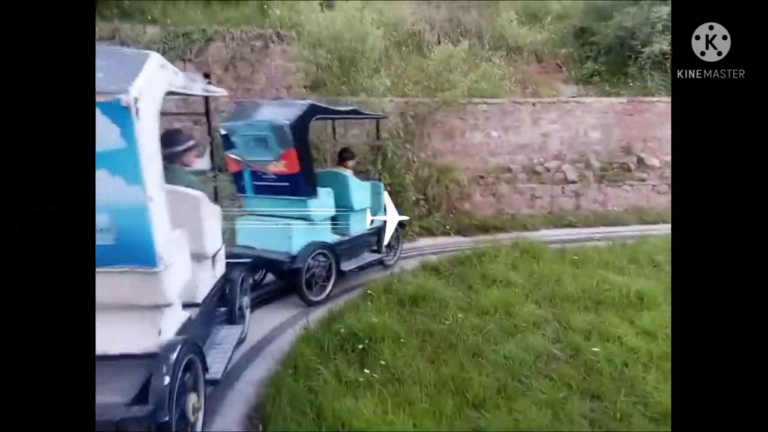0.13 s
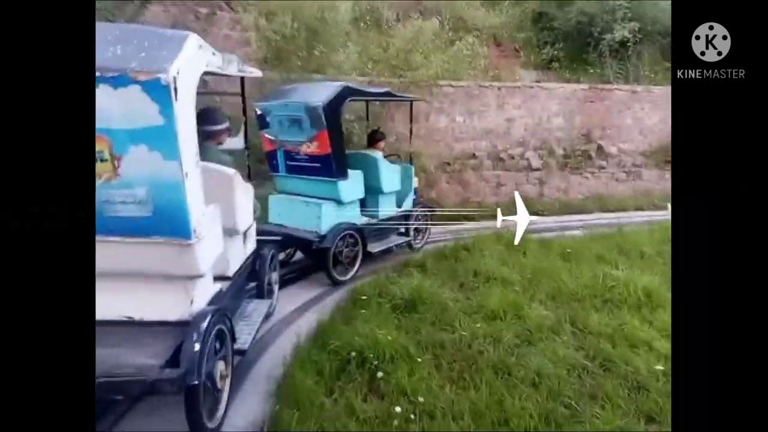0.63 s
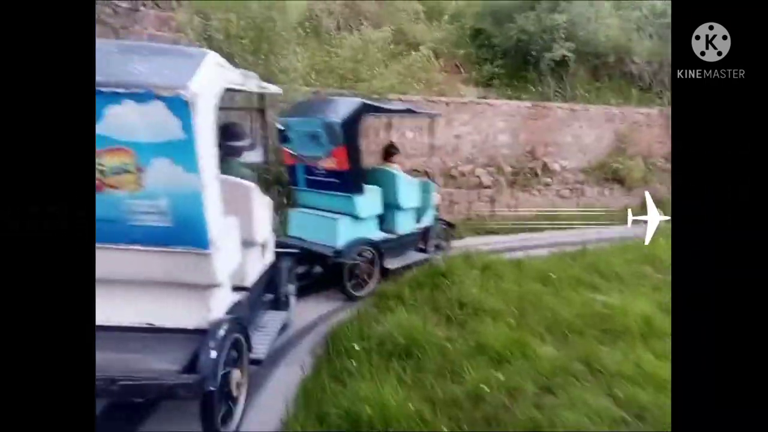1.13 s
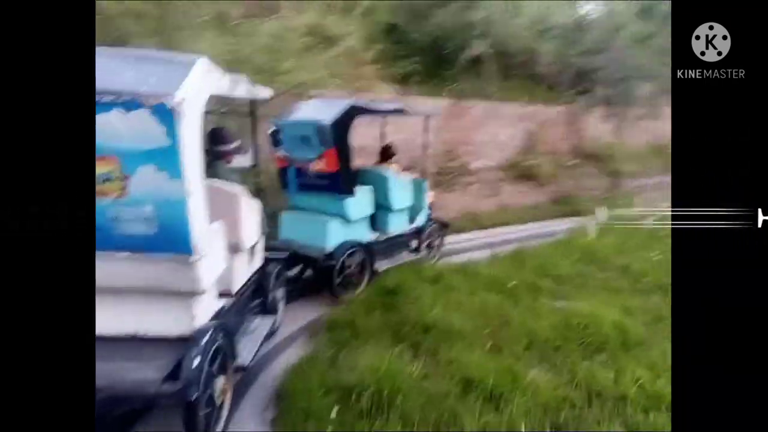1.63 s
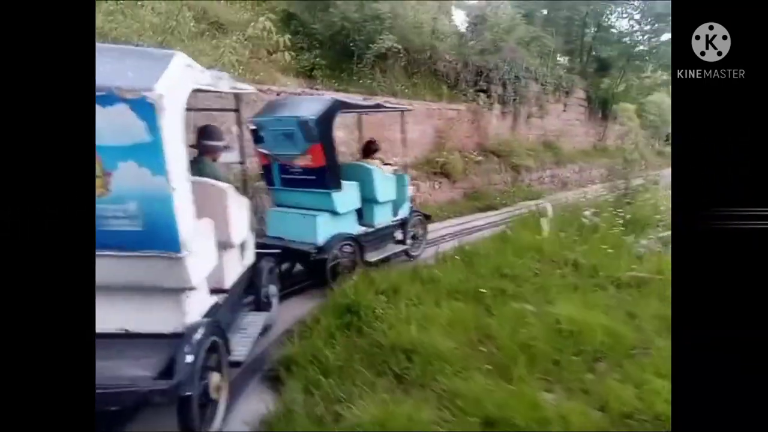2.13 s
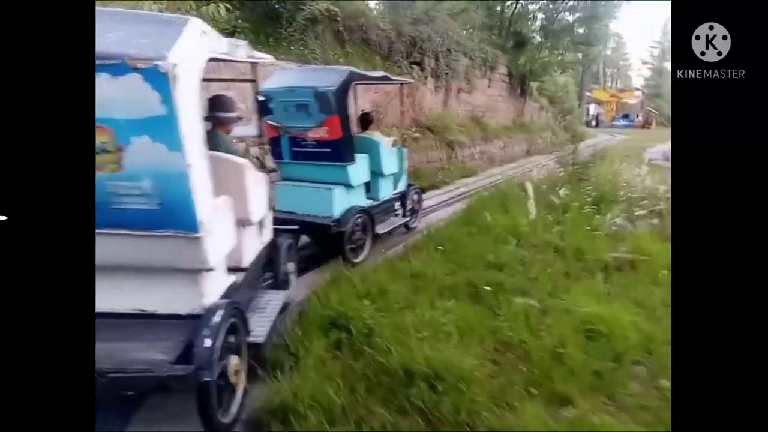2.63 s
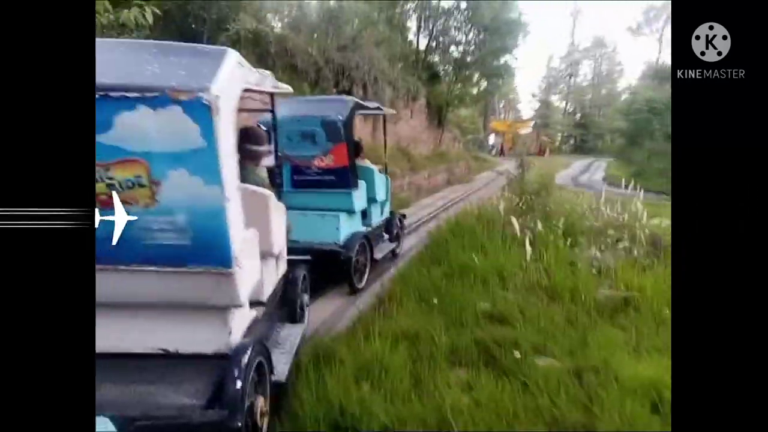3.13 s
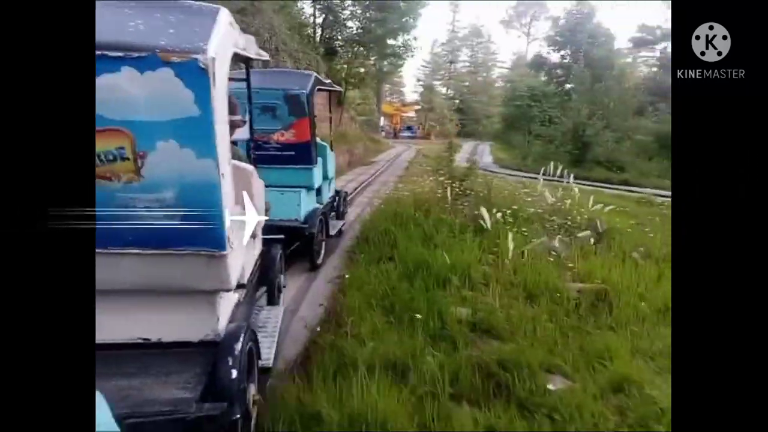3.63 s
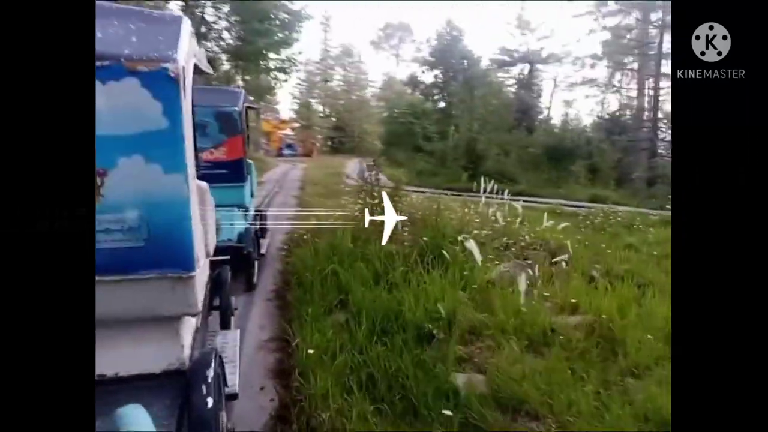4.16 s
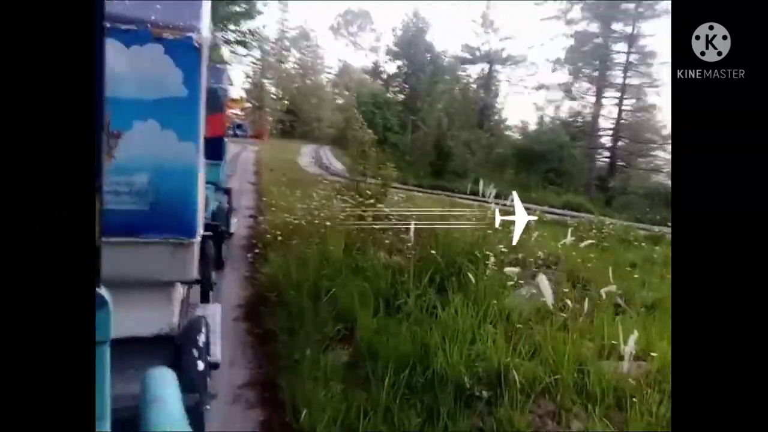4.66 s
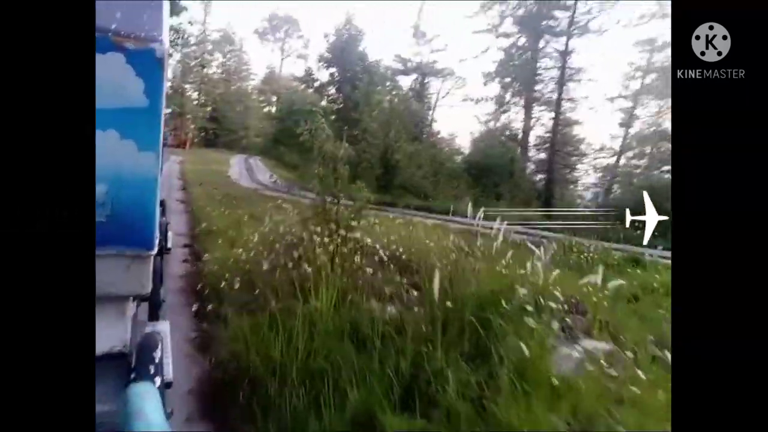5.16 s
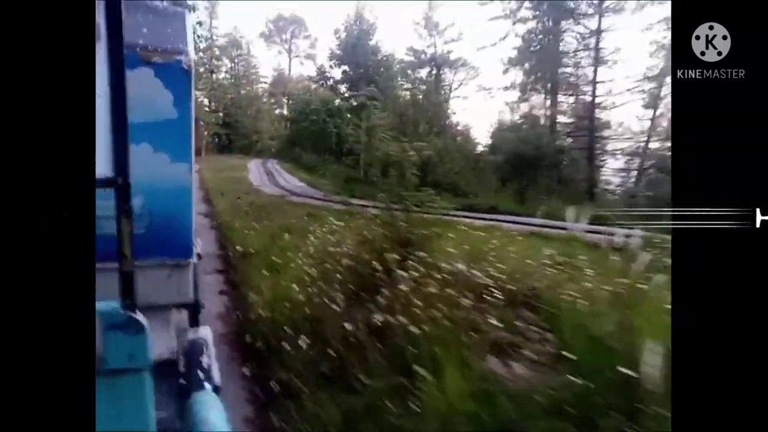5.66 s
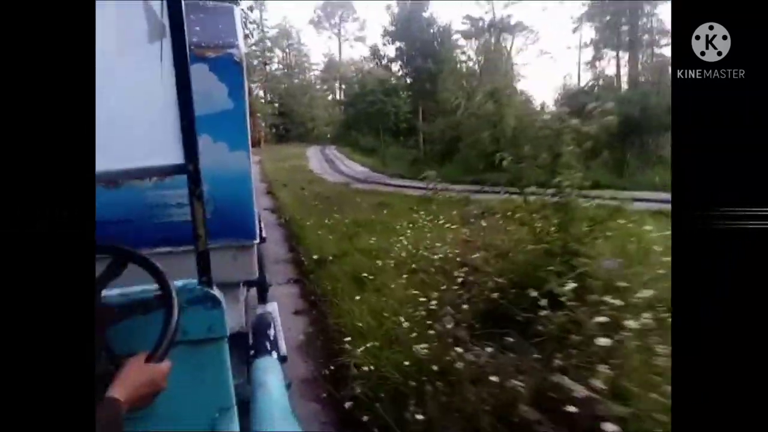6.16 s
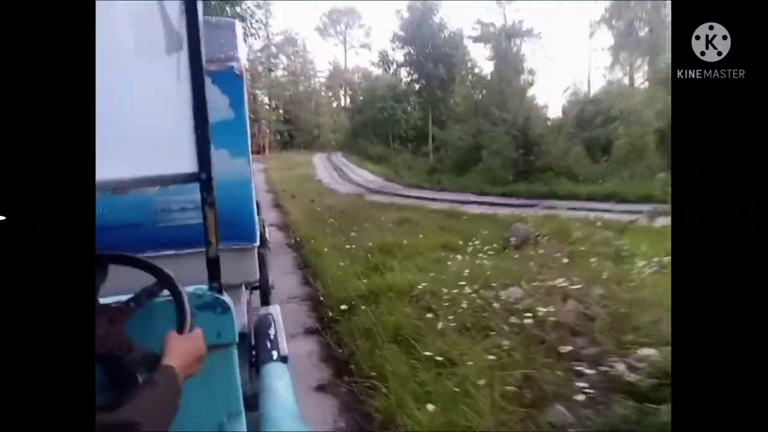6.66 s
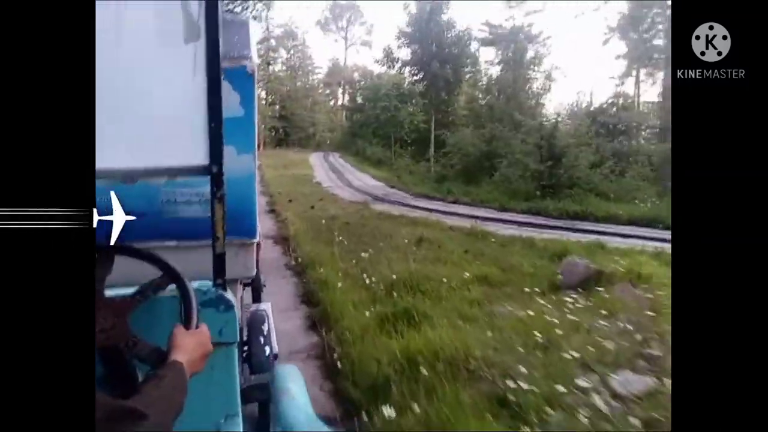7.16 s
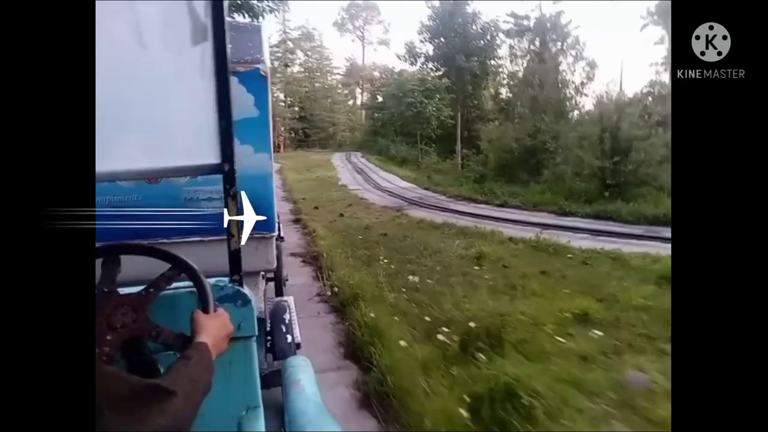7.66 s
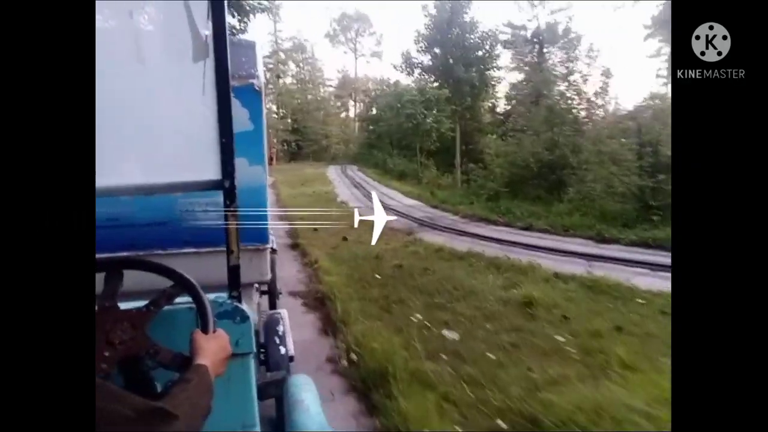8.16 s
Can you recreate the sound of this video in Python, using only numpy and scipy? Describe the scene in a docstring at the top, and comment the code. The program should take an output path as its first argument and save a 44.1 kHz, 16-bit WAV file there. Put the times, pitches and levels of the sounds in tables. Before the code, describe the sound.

An open-air microphone in a wood catches eight ticking chips, then a loud shimmering trill of rising and falling whistles. Farther birds answer, some raspy. From the middle on, a second singer throws out quick liquid whistles, runs and buzzes, then stops. Thin calls drift over open ground at the end, with smeared echoes and a low, steady wind rush.

```python
"""A finch chips, then trills, in a wood; a warbler sings a long string of whistles, sweeps and buzzes.
Farther birds call behind them, some hoarse, some across open ground. Voices are near-sine whistles
gliding through three pitches. Leaves smear the notes and noise echoes from the trees give them a tail,
over a soft rush of far wind made of shaped noise."""
import sys
import numpy as np
from scipy import signal
from scipy.fft import rfft, irfft, next_fast_len
from scipy.io import wavfile
from scipy.ndimage import uniform_filter1d

SR = 44100
rng = np.random.default_rng(int(sys.argv[2]) if len(sys.argv) > 2 else 0)


def boost_factor(decibels):
    """Convert a level in decibels to a linear amplitude factor."""
    exponent = np.asarray(decibels, float) / 20
    return 10 ** exponent


def put_to_file(sound):
    """Save the sound as 16-bit audio at rate SR, in the file named by the first command-line argument."""
    columns = np.atleast_2d(sound).T  # one column per channel
    safe = np.clip(columns, -1, 1)
    whole_steps = np.round(safe * 32767)
    wavfile.write(sys.argv[1], SR, whole_steps.astype(np.int16))


N = 365588

# Finch chip stroke: (time after chip [s], length [s], first [Hz], middle [Hz], last [Hz], level [dB])
CHIP_STROKE = [(.0025, .013, 5400, 7500, 8900, 8.5)]
# Low curl climbing into the stroke: (time after chip [s], length [s], first [Hz], middle [Hz], last [Hz],
# level [dB])
CHIP_CURL = [(-.018, .017, 3020, 3450, 4100, -1.5), (-.0015, .0055, 4050, 4700, 5800, 1)]
# Finch chips: (time [s], stroke level [dB], curl level [dB])
CHIP_TIMES = [(0.014, -47.5, -61), (0.141, -56.5, -55.5), (0.255, -44, -58), (.372, -44.5, -56.5),
              (0.48, -44, -53), (0.584, -39, -52.5), (0.691, -38.5, -53.5), (0.799, -40, -51)]
# Notes between chips and trill: (time [s], length [s], first [Hz], last [Hz], level [dB])
LINK_NOTES = [(.872, 0.017, 4500, 6870, -37.5), (.897, 0.012, 8370, 7700, -38.5)]
# Effort through the trill: (time [s], rise level [dB], fall level [dB], rise pitch share [1])
EFFORT = [(0.931, -32, -39, 1), (1.1, -28.5, -33, 1.0), (1.4, -29, -30.5, 0.99), (1.6, -28, -33.5, 0.98),
          (1.86, -27.5, -30, 1), (1.921, -29.5, -33.5, 0.93), (2.291, -31, -41, 0.95)]
# Warbler slides: (time [s], length [s], first [Hz], last [Hz], level [dB])
WARBLER_SLIDES = [(3.504, 0.06, 4100, 3530, -53.5), (3.505, 0.034, 4560, 4210, -57),
                  (3.615, 0.014, 6000, 4870, -52.5), (3.645, 0.026, 3190, 4830, -51),
                  (4.078, .023, 3000, 3600, -51.5), (4.125, 0.014, 2580, 3360, -43),
                  (4.225, 0.073, 1985, 1777, -48.5), (4.294, 0.029, 2285, 2313, -38.5),
                  (5.015, 0.013, 3940, 3805, -31), (5.163, 0.038, 2520, 1836, -49),
                  (4.587, .028, 2317, 1687, -46), (5.412, .0095, 4450, 5530, -57),
                  (5.864, 0.077, 1905, 2247, -45), (6.28, 0.049, 3223, 3414, -30.5),
                  (6.42, 0.026, 2520, 1713, -43.5), (6.608, 0.023, 5740, 4000, -41.5)]
# Warbler flicks: (time [s], length [s], first [Hz], last [Hz], level [dB])
WARBLER_FLICKS = [(4.1, 0.0092, 3600, 2600, -44), (4.15, 0.013, 3350, 2700, -45),
                  (4.553, 0.036, 3170, 2344, -35), (5.12, 0.038, 3700, 2540, -38.5),
                  (4.652, 0.012, 1730, 2130, -49), (4.704, 0.02, 4450, 4900, -49),
                  (4.719, 0.017, 3270, 5520, -43), (4.972, 0.017, 3000, 4000, -49),
                  (4.988, 0.016, 3890, 5200, -38), (5.001, .013, 5200, 3100, -38),
                  (5.474, 0.0094, 3790, 2760, -40), (5.496, 0.015, 3494, 2670, -44),
                  (6.753, 0.019, 2837, 2250, -37), (6.777, 0.017, 2840, 2170, -40.5)]
# Warbler arches: (time [s], length [s], top [Hz], last [Hz], level [dB])
WARBLER_ARCHES = [(3.671, .094, 5330, 5180, -47), (4.783, 0.037, 2630, 2010, -40.5),
                  (5.515, 0.03, 3260, 2710, -38.5), (5.979, 0.011, 2470, 2200, -40),
                  (6.004, 0.017, 2634, 2280, -41.5), (6.028, 0.017, 2720, 2440, -38.5),
                  (6.109, 0.03, 4330, 3460, -42.5), (6.807, 0.018, 2730, 2590, -34.5)]
# Warbler scoops: (time [s], length [s], first [Hz], bottom [Hz], level [dB])
WARBLER_SCOOPS = [(5.422, 0.02, 4680, 4460, -54), (5.447, 0.015, 5110, 4160, -38.5),
                  (6.126, 0.02, 3840, 3425, -37.5), (6.223, 0.073, 3194, 3160, -34.5),
                  (6.195, 0.028, 3370, 3200, -48), (6.482, 0.026, 3290, 2844, -32.5)]
# Warbler held notes: (time [s], length [s], pitch [Hz], level [dB])
WARBLER_HELD = [(3.502, 0.03, 4910, -59), (3.523, 0.034, 2380, -60), (3.861, 0.043, 1803, -55.5),
                (4.131, 0.013, 3356, -39), (5.929, 0.048, 2203, -44), (6.67, 0.13, 2378, -45)]
# Buzzed glides: (time [s], length [s], first [Hz], last [Hz], level [dB])
BUZZ_GLIDES = [(4.392, 0.137, 2600, 2436, -39), (5.205, 0.037, 1946, 2490, -44),
               (5.245, 0.052, 2647, 2900, -39.5), (5.29, .045, 2900, 3600, -42.5)]
# Hoarse glides: (time [s], length [s], first [Hz], last [Hz], level [dB])
RASP_GLIDES = [(2.565, 0.1, 2350, 3650, -47), (2.66, 0.1, 3600, 3500, -56), (2.785, 0.03, 4600, 5400, -53),
               (2.8, 0.075, 5200, 3835, -45), (2.865, 0.091, 3900, 2640, -45.5),
               (2.945, .07, 2800, 2050, -53), (2.78, .07, 3000, 3300, -58), (3.06, .1, 3000, 4200, -59),
               (3.74, .028, 5250, 3800, -45)]
# Far bird's phrase: (time after its start [s], length [s], first [Hz], middle [Hz], last [Hz], level [dB])
PHRASE_NOTES = [(0, 0.024, 5050, 3915, 3490, 2), (.06, 0.0282, 2730, 3157, 3600, -3),
                (.086, .037, 3550, 3110, 2600, 0.5)]
# Its repeats: (time [s], level [dB], pitch share [1])
PHRASE_TIMES = [(1.16, -51, 1.125), (1.368, -47.5, 1.06), (1.585, -47.5, 1.0), (1.805, -46.5, 0.99)]
# Single far slides: (time [s], length [s], first [Hz], last [Hz], level [dB])
FAR_SINGLES = [(.938, 0.0058, 4500, 3780, -50), (1.039, 0.017, 4380, 3810, -54.5),
               (1.232, 0.0096, 3730, 3750, -47), (2.092, 0.01, 4000, 3900, -50),
               (2.403, 0.012, 3776, 4000, -53), (3.3, 0.038, 4170, 4230, -70),
               (3.31, 0.022, 2300, 2140, -60.5), (3.415, 0.016, 6200, 4500, -66),
               (6.76, 0.058, 3560, 3330, -61), (6.8, 0.043, 3600, 3260, -59.5)]
# Slides across open ground: (time [s], length [s], first [Hz], last [Hz], level [dB])
FIELD_SLIDES = [(3.235, 0.11, 1200, 1770, -64), (3.1, 0.24, 1700, 1840, -66),
                (3.58, 0.15, 1793, 1780, -58.5), (3.988, 0.08, 1500, 1660, -56),
                (4.402, 0.031, 7200, 6150, -54), (4.427, 0.024, 6250, 5850, -53),
                (4.402, 0.042, 9900, 7700, -55), (4.445, .026, 7500, 7600, -60), (9, .02, 4570, 4100, -62),
                (6.36, 0.06, 4400, 5300, -55), (6.776, 0.04, 4800, 5100, -52),
                (7.626, 0.024, 4950, 3720, -61), (7.24, 0.029, 4520, 4460, -71),
                (7.743, 0.029, 4300, 3900, -57), (7.83, 0.038, 3800, 4270, -56),
                (8.226, 0.018, 3700, 4000, -51), (8.13, .015, 5200, 5300, -60),
                (8.243, 0.018, 3400, 6100, -59)]
# Flicks across open ground: (time [s], length [s], first [Hz], last [Hz], level [dB])
FIELD_FLICKS = [(3.45, 0.052, 2980, 3850, -58), (7.405, 0.035, 3650, 4300, -68),
                (7.558, 0.036, 3600, 4400, -64), (7.707, 0.051, 3140, 4000, -61),
                (7.802, 0.035, 2980, 4000, -62), (7.903, .13, 3465, 2800, -53),
                (8.088, 0.13, 3464, 2760, -51), (8.277, 0.012, 4100, 4760, -55)]
# Scatter from trees, thin trunks return less of the low notes: (upper edge [Hz], t60 [s], level [dB])
TREE_BANDS = [(2250, 2.2, -3), (3000, 1.33, -1), (4500, 1.42, -1), (7000, 0.91, 1.5), (11200, 0.82, 1)]
# Spectrum of the wind rush: (frequency [Hz], relative density [dB per Hz])
AIR_SPECTRUM = [(18, -31), (30, -19), (49, -47), (107, -31.5), (216, -4), (288, 1.5), (538, -2.5),
                (2250, -13), (4090, -10), (4780, -12.5), (11900, -19.5), (13900, -27.5), (15000, -41)]

# Share of its way that a note has gone at half its length
SETTLE, HASTEN, STRAIGHT = 0.68, 0.38, 0.48


def finch():
    """Chips, most of the later ones louder, two linking notes, then a trill of rises and falls."""
    rise_hz = (4300, 6430, 6880)  # first, middle, last
    fall_length_s, fall_hz, fall_lag_s = 0.02, (9600, 7750, 6200), 0.025
    rise_share = 0.31  # of the gap between syllables
    overtone_db = 7.5  # against the curl

    strokes = repeats(CHIP_STROKE, [(s, db, 1) for s, db, _ in CHIP_TIMES])
    curls = repeats(CHIP_CURL, [(s, db, 1) for s, _, db in CHIP_TIMES])
    # from the third chip the curl's first part also sounds an octave up
    curls += repeats(CHIP_CURL[:1], [(s, db + overtone_db, 2) for s, _, db in CHIP_TIMES[2:]])

    syllables = trill(count=21)
    rises = [(s, rise_share * gap_s, *np.multiply(rise_hz, share), db)
             for s, gap_s, db, _, share in syllables]
    falls = [(s + fall_lag_s, fall_length_s, *fall_hz, db) for s, _, _, db, _ in syllables]

    stroke_sound = sing(strokes, crest=0.25, sharp=0.4, shake_db=2.0, shake_hz=30,
                        throat_hz=6750, slope_db=135)
    curl_sound = sing(curls, crest=0.6, sharp=0.3, shake_db=2.0, shake_hz=30, throat_hz=3600, slope_db=0)
    rise_sound = sing(glides(LINK_NOTES, STRAIGHT) + rises, crest=0.48, sharp=1.3, shake_db=1.2,
                      shake_hz=30, throat_hz=6600, slope_db=100)
    fall_sound = sing(falls, crest=0.76, sharp=0.51, shake_db=2.0, shake_hz=30, throat_hz=7170, slope_db=82)
    return stroke_sound + curl_sound + rise_sound + fall_sound


def trill(count):
    """Evenly slowing syllables: time, gap, rise and fall levels, rise pitch share, with random scatter."""
    start_s, first_gap_s, slowing_s = 0.933, 0.0595, 0.00088  # slowing: growth of the gap per syllable
    scatter_db, scatter_share = 0.7, 0.0102
    gap_s = first_gap_s + slowing_s * np.arange(count)
    s = start_s + np.append(0, np.cumsum(gap_s[:-1]))
    at_s, *effort = np.transpose(EFFORT)
    rise_db, fall_db, share = (np.interp(s, at_s, column) for column in effort)
    chance = rng.standard_normal((count, 3)).T
    rise_db = rise_db + scatter_db * chance[0]
    fall_db = fall_db + scatter_db * chance[1]
    share = share + scatter_share * chance[2]
    return list(zip(s, gap_s, rise_db, fall_db, share))


def sing(notes, crest, sharp, shake_db, shake_hz, throat_hz, slope_db,
         buzz_hz=0.0, buzz_depth=0.0, buzz_swing=0.0):
    """Near-sine whistles; each swells to a crest and wavers; a buzz pumps pitch and level together."""
    out, pad = np.zeros(3 * N), N
    shake, waver = walk(150), walk(400)
    for s, length_s, first, middle, last, db in notes:
        u = np.linspace(0, 1, int(length_s * SR))
        at = int(s * SR) + np.arange(len(u))
        # parabola through the three pitches
        hz = first * (1 - u) * (1 - 2 * u) + 4 * middle * u * (1 - u) + last * u * (2 * u - 1)
        pump = np.sin(2 * np.pi * (buzz_hz * length_s * u + 0.023 * shake[at % N]))
        hz = hz * (1 + buzz_swing * pump) + shake_hz * waver[at % N]
        # the throat favours its own pitch: slope_db lost an octave away
        colour_db = -slope_db * np.log2(hz / throat_hz) ** 2
        level_db = db + colour_db - colour_db.max() + shake_db * shake[at % N]
        swell = np.sin(np.pi / 2 * np.minimum(u / crest, (1 - u) / (1 - crest))) ** sharp
        envelope = swell * (1 + buzz_depth * pump) * boost_factor(level_db)
        out[pad + at] += envelope * np.sin(2 * np.pi * np.cumsum(hz) / SR)
    return out[pad:pad + N]


def walk(rate_hz):
    """Random levels held 1 / rate_hz and slewed twice; spread near 1."""
    k = int(SR / rate_hz)
    held = np.repeat(rng.standard_normal(N // k + 1), k)
    return 1.417 * uniform_filter1d(uniform_filter1d(held, k), k)[:N]


def glides(rows, share):
    """Puts in the middle pitch, a share of the way from first to last."""
    return [(s, length_s, first, first + share * (last - first), last, db)
            for s, length_s, first, last, db in rows]


def repeats(shape, rows):
    """One phrase sung again at each (time [s], level [dB], pitch share [1])."""
    return [(s + lag_s, length_s, *np.multiply(hz, share), db + part_db)
            for s, db, share in rows for lag_s, length_s, *hz, part_db in shape]


def warbler():
    """Clear whistles: slides settle, flicks hasten, arches bend over, scoops bend under, runs step."""
    arch_start, scoop_end = 0.9, 1.04  # pitch shares of the top and of the bottom
    arches = [(s, length_s, arch_start * top, top, last, db)
              for s, length_s, top, last, db in WARBLER_ARCHES]
    scoops = [(s, length_s, first, low, scoop_end * low, db)
              for s, length_s, first, low, db in WARBLER_SCOOPS]
    held = [(s, length_s, hz, hz, hz, db) for s, length_s, hz, db in WARBLER_HELD]
    ripple = run(start_s=3.845, gap_s=0.02, hz=2314, step_hz=-52, db=-46.5, fade_db=1,
                 length_s=0.018, first_share=0.91, last_share=1.08, count=4)
    ladder = run(start_s=5.658, gap_s=0.0172, hz=2480, step_hz=343, db=-35.5, fade_db=9.5,
                 length_s=0.013, first_share=0.93, last_share=0.99, count=5)
    notes = glides(WARBLER_SLIDES, SETTLE) + glides(WARBLER_FLICKS, HASTEN)
    notes += arches + scoops + held + ripple + ladder
    return sing(notes, crest=0.21, sharp=0.19, shake_db=0.5, shake_hz=26.0, throat_hz=3100, slope_db=0.0)


def run(start_s, gap_s, hz, step_hz, db, fade_db, length_s, first_share, last_share, count):
    """Quick notes that step in pitch and swell to a crest."""
    place = np.linspace(-1, 1, count) - 0.25  # distance from the loudest point, just past the middle
    return [(start_s + k * gap_s, length_s, *np.multiply(hz + k * step_hz, (first_share, 1, last_share)),
             db - fade_db * place[k] ** 2) for k in range(count)]


def buzzes():
    """The warbler's buzzes: glides pumped about seventy-five times a second."""
    return sing(glides(BUZZ_GLIDES, STRAIGHT), crest=0.5, sharp=0.28, shake_db=3.0, shake_hz=40.7,
                throat_hz=3000, slope_db=26, buzz_hz=75.5, buzz_depth=0.17, buzz_swing=0.076)


def rasps():
    """Hoarse glides, pumped too fast and unevenly to count; the falls swing wider than the rises."""
    rises = [row for row in RASP_GLIDES if row[3] > row[2]]
    falls = [row for row in RASP_GLIDES if row[3] <= row[2]]
    return sum(sing(glides(rows, STRAIGHT), crest=0.7, sharp=0.4, shake_db=3.0, shake_hz=120.0,
                    throat_hz=3700, slope_db=22.0, buzz_hz=141.6, buzz_depth=0.5, buzz_swing=swing)
               for rows, swing in ((rises, 0.04), (falls, 0.085)))


def far_birds():
    """Calls from deeper in the wood: a repeated phrase, one falling note again and again, single slides."""
    start_s, gap_s, length_s, fall_hz = 2.083, 0.08, 0.038, (4200, 2950, 2280)
    first_db, growth_db = -56, 1.44  # growth per repeat
    falls = [(start_s + k * gap_s, length_s, *fall_hz, first_db + k * growth_db) for k in range(6)]
    phrases = sing(repeats(PHRASE_NOTES, PHRASE_TIMES), crest=0.6, sharp=0.4, shake_db=2.5, shake_hz=40.0,
                   throat_hz=3200, slope_db=12)
    # negative slope: louder away from the throat pitch
    fall_sound = sing(falls, crest=0.5, sharp=0.2, shake_db=1.5, shake_hz=40.0, throat_hz=3100, slope_db=-30)
    singles = sing(glides(FAR_SINGLES, SETTLE), crest=0.15, sharp=0.11, shake_db=2.5, shake_hz=55.0,
                   throat_hz=3100, slope_db=2)
    return phrases + fall_sound + singles


def open_birds():
    """Faint but clear calls that come across open ground."""
    notes = glides(FIELD_SLIDES, SETTLE) + glides(FIELD_FLICKS, HASTEN)
    return sing(notes, crest=0.25, sharp=0.35, shake_db=2.5, shake_hz=26.6, throat_hz=4000, slope_db=4.0)


def chatter(count, db, low_hz, high_hz):
    """Too many distant birds to tell apart: short random glides."""
    when, length, pitch, bend, glide, size = rng.random((count, 6)).T
    hz = low_hz * (high_hz / low_hz) ** pitch
    middle_hz = hz * (0.9 + 0.28 * bend)
    last_hz = hz * (0.63 + 0.447 * glide)
    notes = np.transpose([when * (N / SR - 0.1), 0.0206 + 0.075 * length, hz, middle_hz, last_hz,
                          db - 6 * size])
    return sing(notes, crest=0.58, sharp=0.29, shake_db=7.5, shake_hz=30, throat_hz=3600, slope_db=-15)


def leaves(x, clear_db, spread_s, stir_hz, count=10):
    """Foliage smears a note: part comes straight through, the rest by short detours that flutter."""
    lags = (rng.random(count) * spread_s * SR).astype(int)
    detours = sum(np.roll(x, lag) * walk(stir_hz) for lag in lags)
    return boost_factor(clear_db) * x + detours / np.sqrt(count)


def wood(x, build_s, near_db, near_s, stir_hz):
    """Countless small echoes: the ring of trees answers until near_s, far trunks ring on more softly.
    Wind stirs the branches, so each note meets its own blend of two echo patterns."""
    twigs_db, twigs_t60_s = 10.5, 0.12  # the nearest echoes
    t = np.arange(SR) / SR
    noise = rfft(rng.standard_normal((2, SR)))
    hz = np.arange(SR // 2 + 1)
    tail, low_hz = 0, 0
    for high_hz, t60_s, db in TREE_BANDS:
        band = irfft(noise * (hz >= low_hz) * (hz < high_hz))
        tail = tail + band * boost_factor(db - 60 * t / t60_s)
        low_hz = high_hz
    glade = boost_factor(near_db) / (1 + (t / near_s) ** 8)
    twigs = boost_factor(twigs_db - 60 * t / twigs_t60_s)
    tail = tail * (1 + glade + twigs) * (1 - np.exp(-t / build_s)) / np.sqrt(SR)
    blend = np.pi * walk(stir_hz)
    sent = x * np.array([np.cos(blend), np.sin(blend)])
    return signal.fftconvolve(sent, tail, axes=1)[:, :N].sum(axis=0)


def air():
    """Far wind: noise shaped to a smooth rush that swells a little."""
    level_db, swell_db = -60, 0.5
    hz, db = np.transpose(AIR_SPECTRUM)
    size = next_fast_len(N)
    bins_hz = np.maximum(np.arange(size // 2 + 1) * SR / size, 1)
    shape = boost_factor(np.interp(np.log(bins_hz), np.log(hz), db))
    rush = irfft(rfft(rng.standard_normal(size)) * shape, size)[:N]
    return rush / np.std(rush) * boost_factor(level_db + swell_db * walk(2.49))


def scene():
    """The deeper the bird sits in the wood, the larger the share of smeared and scattered sound."""
    high, clear, buzz, rasp, far, across = finch(), warbler(), buzzes(), rasps(), far_birds(), open_birds()
    crowd = chatter(count=500, db=-78.5, low_hz=2600, high_hz=5200)

    # noise that follows the finch's loudness widens the echoes of its notes into a haze
    noise = signal.sosfilt(signal.butter(2, 3500, fs=SR, output="sos"), rng.standard_normal(N))
    finch_haze = boost_factor(-8.5) * noise * high
    scattered = (boost_factor(2.5) * (high + finch_haze) + boost_factor(4.5) * clear + boost_factor(3.5) * buzz + boost_factor(5.5) * rasp
                 + boost_factor(8.5) * far + boost_factor(-2) * across + boost_factor(8.0) * crowd)

    near = leaves(clear + buzz, clear_db=9.5, spread_s=0.008, stir_hz=29.8)
    deep = leaves(rasp + crowd, clear_db=0.1, spread_s=0.009, stir_hz=50.0)
    middle = leaves(far, clear_db=6.0, spread_s=0.006, stir_hz=40.37)
    field = leaves(across, clear_db=14.0, spread_s=0.005, stir_hz=30.0)
    direct = high + boost_factor(-13.0) * field + boost_factor(-6.5) * middle + boost_factor(-9.0) * near + boost_factor(-2.5) * deep
    echoes = wood(scattered, build_s=0.005, near_db=-1.0, near_s=0.12, stir_hz=6.0)
    return (direct + echoes + air())[None]


def top_cut(x):
    """Nothing passes above the cut-off."""
    return signal.sosfilt(signal.butter(12, 14500, fs=SR, output="sos"), x)


def record(dry):
    """Loud notes bring a faint haze of noise, and faint overtones and low thumps from a squared share."""
    haze = signal.sosfilt(signal.butter(1, 3300, fs=SR, output="sos"), rng.standard_normal(N))
    hazy = dry * (1 + boost_factor(-34.0) * haze)
    squared = boost_factor(-39) * dry ** 2
    return top_cut(hazy + squared)


dry = scene()
out = record(dry)
put_to_file(out)
```